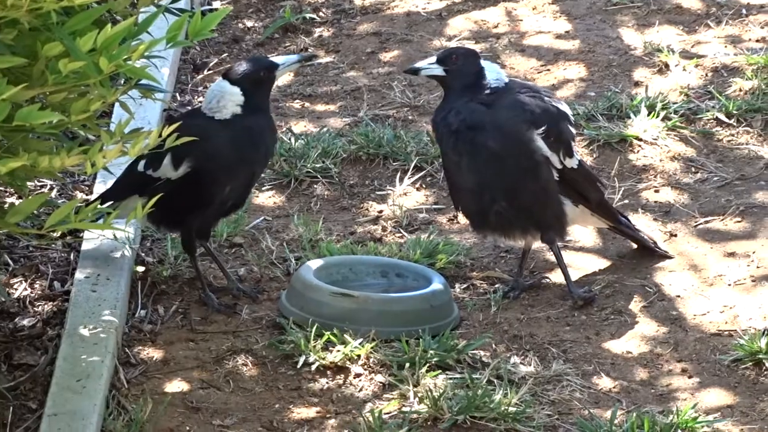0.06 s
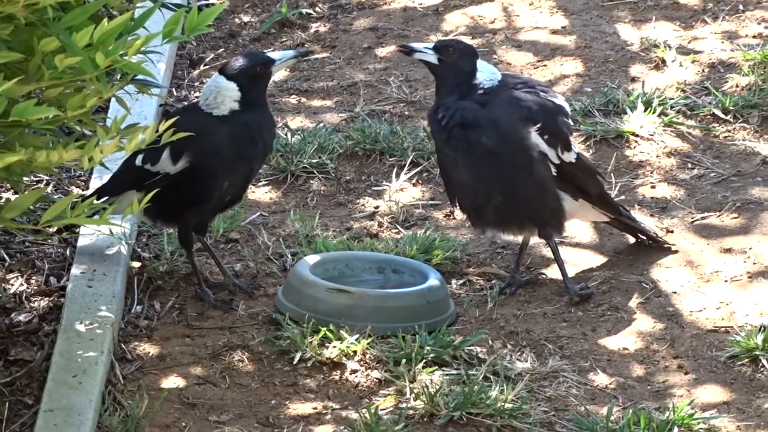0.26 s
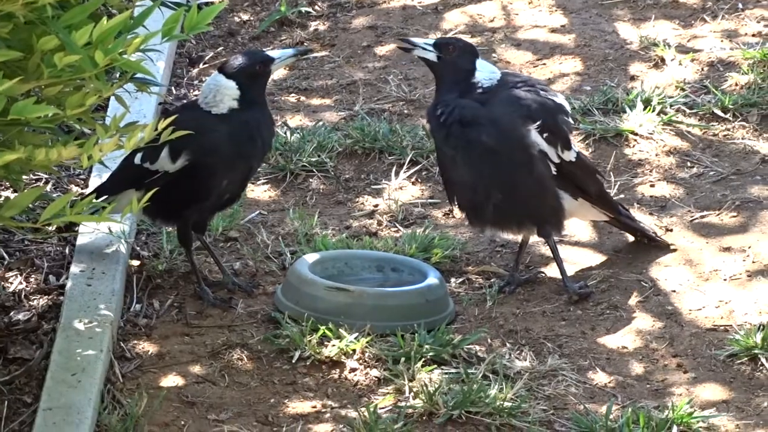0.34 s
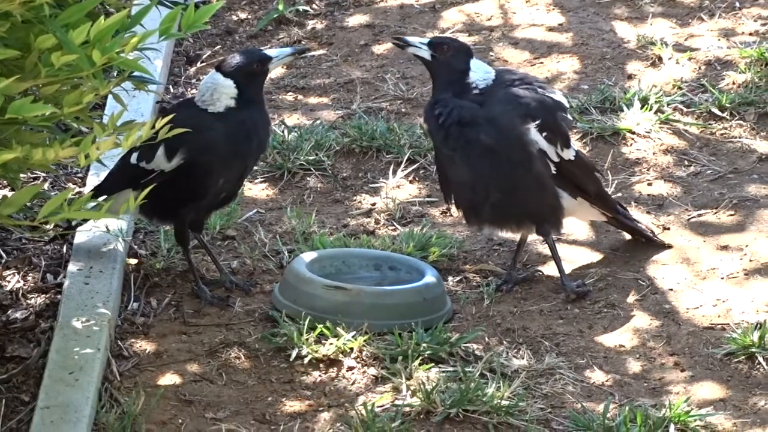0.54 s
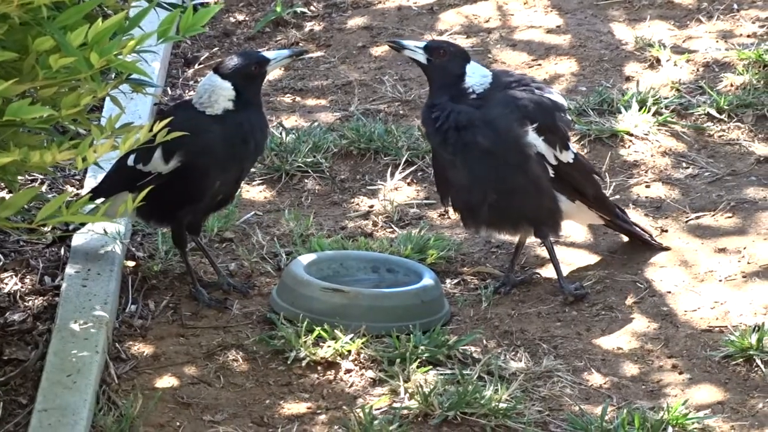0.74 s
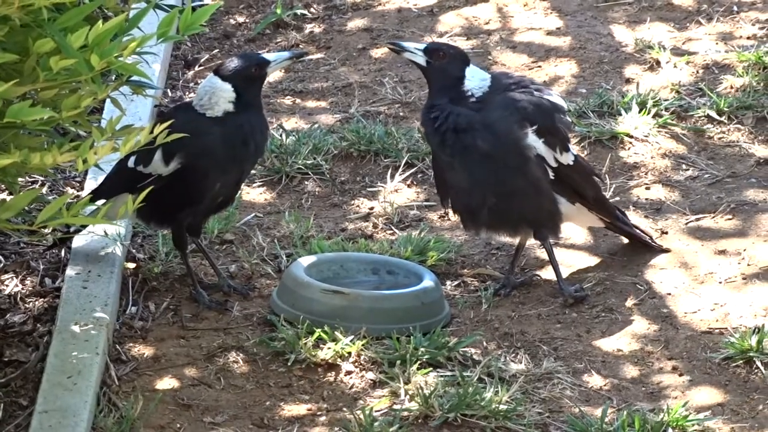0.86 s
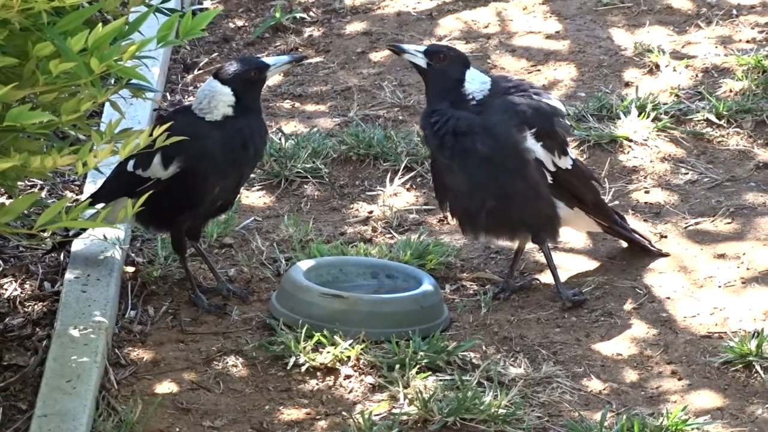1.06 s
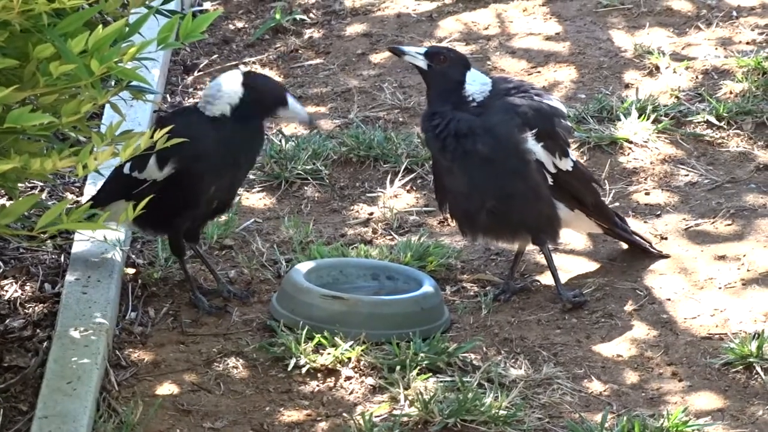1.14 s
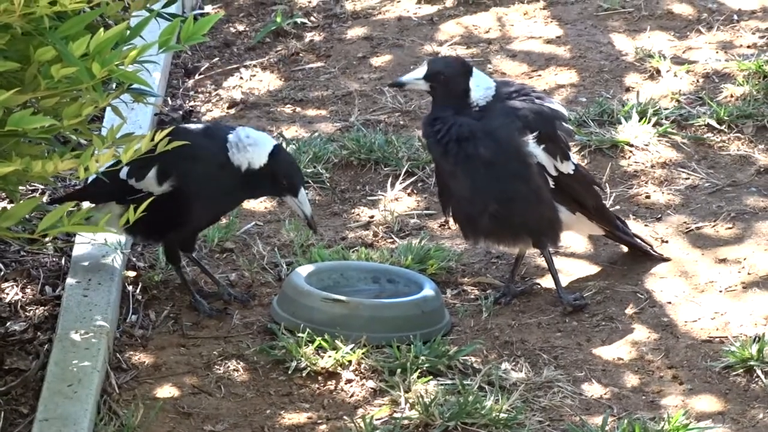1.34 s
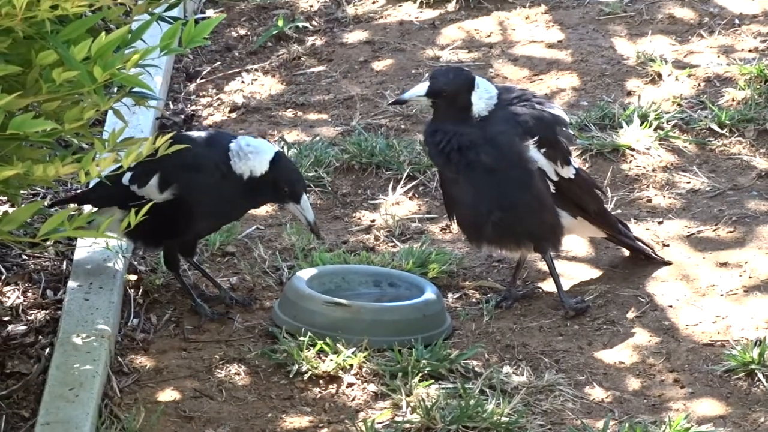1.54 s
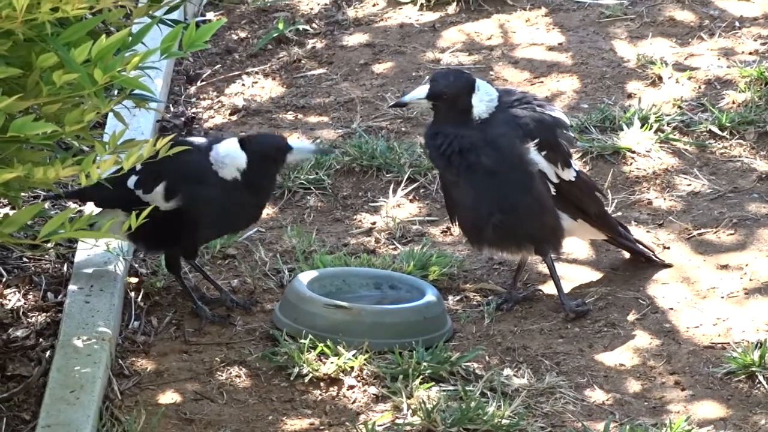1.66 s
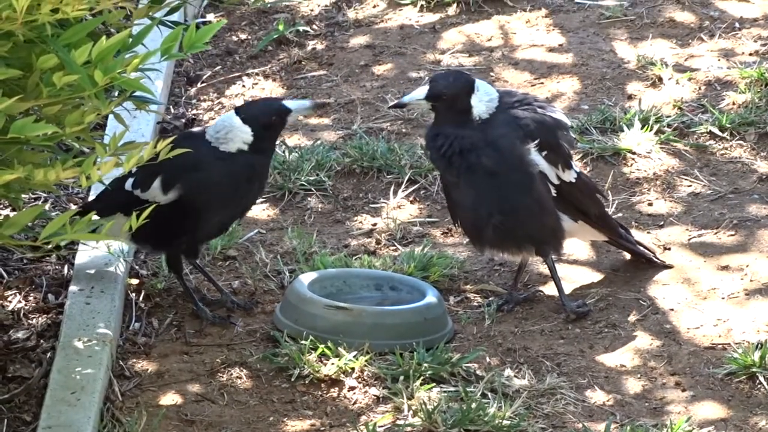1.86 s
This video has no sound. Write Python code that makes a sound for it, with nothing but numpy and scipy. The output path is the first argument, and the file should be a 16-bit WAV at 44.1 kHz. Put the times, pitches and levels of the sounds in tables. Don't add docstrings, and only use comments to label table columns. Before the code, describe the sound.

Magpie calling close by in a yard: harsh croaky squawks, then a clear falling note ending in a rattle

```python
import sys
import numpy as np
from scipy import signal
from scipy.fft import rfft, irfft
from scipy.io import wavfile
from scipy.ndimage import uniform_filter1d

SR = 44100
rng = np.random.default_rng(int(sys.argv[2]) if len(sys.argv) > 2 else 0)


def volts_from_decibels(level):
    exponent = np.asarray(level, float) / 20
    return 10 ** exponent


def generate_wav(sig):
    pcm = np.round(np.clip(np.atleast_2d(sig).T, -1, 1) * 32767).astype(np.int16)
    wavfile.write(sys.argv[1], SR, pcm)


N = 83790


def rms_one(x):
    return x / np.sqrt(np.mean(x ** 2) + 1e-20)


def at_hz(points, hz):
    point_hz, level_db = np.transpose(points)
    return np.interp(np.log(hz), np.log(point_hz), level_db)


def drift(rate_hz, size=N):
    settle = 20000
    r = np.exp(-2 * np.pi * rate_hz / SR)
    wander = signal.lfilter([1], [1, -2 * r, r * r], rng.standard_normal(size + settle))
    return rms_one(wander[settle:])


def swelling_bands(spectrum, edges_hz, patchy_db):
    # (frequency [Hz], correlation [-1 to 1])
    likeness = [(60, 1), (220, 0.93), (800, 0.51), (2930, 0.42), (10700, 0.64)]
    out = 0
    together = drift(0.17)
    white = rng.standard_normal((2, 2, N + SR))
    for k, (low, high) in enumerate(zip(edges_hz, edges_hz[1:])):
        band = signal.butter(2, [low, high], "band", fs=SR, output="sos")
        mid, side = signal.sosfilt(band, white[k % 2])[:, SR:]
        hz = np.sqrt(low * high)
        alike = np.clip(at_hz(likeness, hz), -1, 1)
        gain = volts_from_decibels(at_hz(spectrum, hz) + patchy_db * (0.6 * together + drift(6)))
        out = out + gain * (np.sqrt(1 + alike) * mid + np.sqrt(1 - alike) * side * [[1], [-1]])
    return rms_one(out)


def far_traffic():
    # (frequency [Hz], density [dB per Hz])
    rumble = [(12, -47), (20, -7.5), (92, -2.5), (179, -4), (236, -12.5), (401, -9), (492, -12.5),
              (574, -15), (1200, -17.5), (1560, -53), (2640, -120)]
    return volts_from_decibels(-49) * swelling_bands(rumble, np.geomspace(14, 1200, num=16), patchy_db=2.12)


def leaf_hiss():
    # (time [s], level [dB])
    breeze = [(0, -1.5), (.3, 2.5), (1.25, 4.5), (1.5, 3.5), (1.9, 1.1)]
    # (frequency [Hz], density [dB per Hz])
    leaf_spectrum = [(710, -29), (1200, -0.5), (1660, -3.5), (2000, -4.5), (2310, -4.5), (4110, -17.5),
                     (8350, -11), (11200, -13.5), (14500, -44), (22000, -120)]
    gain = volts_from_decibels(-61 + np.interp(np.arange(N) / SR, *np.transpose(breeze)))
    return gain * swelling_bands(leaf_spectrum, np.geomspace(1200, 12000, num=11), patchy_db=0.4)


def machinery_hum():
    # (pitch [Hz], wander [Hz], level [dB], change time [s], change [dB])
    drones = [
        (100, 5, -58, 1.2, -2),
        (173, 2.5, -55, 1.15, -8),
        (400, 18, -68, 1.7, 8),
        (930, 15, -88, 1.7, 22),
    ]
    out = 0
    t = np.arange(N) / SR
    for hz, wander_hz, db, change_s, change_db in drones:
        phase = 2 * np.pi * np.cumsum(hz + wander_hz * drift(11.94)) / SR
        changed = np.clip((t - change_s) / 0.079, 0, 1)
        level_db = db + 2.25 * drift(11) + change_db * changed
        out = out + volts_from_decibels(level_db) * np.sqrt(2) * np.sin(phase)
    return out


def note(rows, flutter_hz, high_db, breath_db, lean=0, shake=0.57, tilt_db=0):
    # (frequency [Hz], level [dB])
    throat = [(2900, -17.5), (4100, -5.5), (5200, -10), (6900, -20), (8000, -5), (8900, -14), (10050, -6),
              (10450, -30)]
    # (frequency [Hz], level [dB])
    breath_low = [(900, -58), (1500, 4.5), (2300, -7.5)]
    flutter_bend, pitch_jitter = 0.008, 0.005
    edge_s, smear_rad = 0.0022, 1.1

    s, *columns = np.transpose(rows)
    t = np.arange(N) / SR
    hz, db, octave_db, harsh = [np.interp(t, s, column) for column in columns]
    harsh = np.clip(harsh, 0, 1)
    edge = np.clip(np.minimum(t - s[0], s[-1] - t) / edge_s + 0.5, 0, 1)

    flutter = 2 * np.pi * np.cumsum(flutter_hz * (1 + 0.12 * drift(43.4))) / SR
    flutter = flutter - flutter[int(s[0] * SR)]
    bend = flutter_bend * np.sin(flutter) + pitch_jitter * drift(340)
    hz = uniform_filter1d(hz, size=130) * (1 + shake * harsh * bend)
    phase = 2 * np.pi * np.cumsum(hz) / SR
    beat = 1 + shake * harsh * (np.cos(flutter) + 0.5 * drift(84))
    tone = volts_from_decibels(db) * beat * np.sin(phase)

    smear = smear_rad * harsh * (np.sin(flutter) + 0.55 * drift(220))
    lift_db = high_db + lean * (db - octave_db) + 20 * harsh
    overtone_beat = 1 + 0.6 * harsh * np.cos(flutter)
    for k in range(2, 10):
        colour_db = 0
        if k > 2:
            flicker_db = (2.5 + harsh) * drift(67)
            colour_db = lift_db + tilt_db * (k - 3) + flicker_db + at_hz(throat, k * hz)
        level = volts_from_decibels(octave_db + colour_db) * (k * hz < 0.4 * SR)
        tone += level * overtone_beat * np.cos(k * phase + np.sqrt(k - 1) * smear)

    white = rfft(rng.standard_normal(N))
    bin_hz = np.arange(len(white)) * SR / N + 1
    breath = rms_one(irfft(white * volts_from_decibels(at_hz(breath_low + throat, bin_hz)), N))
    puffs = harsh * (1 + harsh * np.cos(flutter))
    tone += volts_from_decibels(breath_db) * (volts_from_decibels(db) + volts_from_decibels(octave_db)) * puffs * breath
    return np.sqrt(2) * edge * tone


def first_phrase():
    # (time [s], pitch [Hz], fundamental [dB], octave [dB], harshness [0-1])
    lead_in = [(0.18, 1594, -53, -82, 0), (0.186, 1477, -54.5, -89, 0.9), (0.218, 1428, -35, -82, 1),
               (0.236, 1340, -37, -77, 0.9)]
    croak = [(0.234, 1191, -50, -39.5, 0.37), (0.244, 1042, -45.5, -28.5, 0.22),
             (0.25, 1060, -34, -25, 0.1), (0.257, 1080, -38.5, -37, 0.3)]
    yelp = [(.253, 1473, -40, -66, 0.2), (.257, 1740, -28, -50, 0.091), (.261, 2060, -29.5, -28.5, .05),
            (.266, 2148, -24.5, -35.5, 0.067), (.273, 2036, -22.5, -21.5, 0.035),
            (.277, 1990, -33, -35.5, 0.27), (.282, 1570, -28.5, -64, 0.46)]
    squawk = [(0.283, 1445, -28.5, -72, 0.58), (0.291, 1373, -32.5, -70, 0.51),
              (0.301, 1321, -36, -59, 0.52), (0.314, 1278, -29, -55, 0.1), (0.326, 1254, -26.5, -45, 0.045),
              (0.337, 1179, -40.5, -30, 0.1), (0.357, 1134, -47, -26.5, 0.099),
              (0.373, 1120, -46.5, -33, 0.13), (0.41, 1080, -59, -59, 0.11)]
    side_voice = [(.325, 1600, -48, -61, .4), (.36, 1407, -42.5, -70, 0.48), (.41, 1382, -49.5, -67, 0.29)]
    return (note(lead_in, 159, high_db=-5.5, breath_db=-26.5)
            + note(croak, 197, high_db=-19.5, breath_db=-6)
            + note(yelp, 215, high_db=-9, breath_db=2)
            + note(squawk, 282, high_db=-12, breath_db=-5, lean=0.75, shake=0.4)
            + note(side_voice, 130, high_db=-18, breath_db=-23))


def second_phrase():
    # (time [s], pitch [Hz], fundamental [dB], octave [dB], harshness [0-1])
    pickup = [(.53, 2190, -44, -72, 0.12), (.534, 2087, -35, -52, .1), (.542, 1950, -39, -54, 0.22),
              (.548, 1595, -47, -55, 0.25), (.554, 1450, -50, -56, 0.3)]
    arch = [(.555, 1667, -44, -43, 0.6), (.561, 2143, -35, -40, 0.34), (.567, 2246, -25.5, -41, 0.18),
            (.576, 2278, -25, -38.5, 0.29), (.586, 2070, -28, -32.5, 0.55), (.598, 1840, -32, -38, 0.83),
            (.613, 1715, -29, -40.5, 0.99), (.637, 1724, -27, -58, 0.3), (.657, 1760, -53, -55, 0.62)]
    under_voice = [(.596, 1640, -42, -70, .5), (.614, 1575, -30, -58, .6), (.636, 1570, -32, -58, .6),
                   (.645, 1570, -39, -68, .5), (.658, 1585, -56, -84, .4)]
    return (note(pickup, 200, high_db=-7, breath_db=-4)
            + note(arch, 145, high_db=-15, breath_db=-17, shake=0, tilt_db=1.5)
            + note(under_voice, 152, high_db=3.5, breath_db=-43, shake=0, tilt_db=3.5))


def third_phrase():
    # (time [s], pitch [Hz], fundamental [dB], octave [dB], harshness [0-1])
    whistle = [(0.742, 2466, -55, -90, 0.01), (0.752, 2376, -43.5, -68, 0.01),
               (0.772, 2287, -34, -61, 0.0074), (0.782, 2290, -27.5, -68.5, 0.011),
               (0.796, 2211, -31.5, -46, 0.01), (0.846, 2188, -26, -37.5, 0.012),
               (.9, 2117, -28.5, -33, .01), (0.934, 2051, -32, -25, 0.01), (0.958, 1965, -28.5, -29, 0.044)]
    thin_voice = [(.752, 3800, -68, -90, .3), (.772, 3400, -59, -90, .7), (.79, 3200, -59, -90, .7),
                  (.81, 3080, -68, -90, .3)]
    rattle = [(.958, 1966, -33, -39, 0.29), (.963, 1959, -31, -36, 0.62), (.972, 1913, -36.5, -33, 0.76),
              (.988, 1856, -37, -37, 0.61), (1.012, 1729, -46, -39.5, 0.72), (1.036, 1757, -38.5, -40, 0.7),
              (1.048, 1836, -31, -36, 0.33), (1.063, 1960, -31.5, -46.5, 0.45),
              (1.07, 2030, -39, -58, 0.33)]
    tail_note = [(1.073, 1650, -52, -62, 0.4), (1.078, 1665, -34, -52, 0.5), (1.09, 1677, -35, -52, .6),
                 (1.1, 1680, -48, -56, .6), (1.112, 1685, -50, -66, .5), (1.14, 1689, -64, -78, 0.3)]
    return (note(whistle, 170, high_db=-5, breath_db=-21, lean=0.3, tilt_db=-1.5)
            + note(thin_voice, 233, high_db=-23, breath_db=0.0)
            + note(rattle, 155, high_db=-11, breath_db=-30, shake=0.8, tilt_db=-3.5)
            + note(tail_note, 122, high_db=-17, breath_db=-23.5))


def magpie():
    return first_phrase() + second_phrase() + third_phrase()


def soil_bounce(bird):
    lags_s = [0.00100, 0.00112]
    return volts_from_decibels(-16) * np.array([np.roll(bird, int(lag * SR)) for lag in lags_s])


def yard_echo(bird):
    t60_s, first_s = 0.3, 0.004
    t = np.arange(SR // 2) / SR
    mid, side = rng.standard_normal((2, SR // 2)) * volts_from_decibels(-60 * t / t60_s) * (t > first_s)
    tail = mid + volts_from_decibels(-7) * side * [[1], [-1]]
    tail = signal.sosfilt(signal.butter(1, 12000, fs=SR, output="sos"), tail)
    tail = tail / np.sqrt(np.sum(tail ** 2) / 2)
    return volts_from_decibels(-17) * signal.fftconvolve(bird[None], tail, axes=1)[:, :N]


def foot_rustle():
    start_s, level_db, t60_s, low_hz = 1.193, -58, 0.1, 5500
    after = np.arange(N) / SR - start_s
    bright = signal.butter(2, low_hz, "high", fs=SR, output="sos")
    hiss = signal.sosfilt(bright, rng.standard_normal(N))
    return volts_from_decibels(level_db - 60 * np.abs(after) / t60_s) * (after > 0) * hiss


def scene():
    background = far_traffic() + leaf_hiss() + machinery_hum()
    bird = magpie()
    direct = bird * volts_from_decibels(np.array([[-0.1], [0.1]]))
    return background + direct + soil_bounce(bird) + yard_echo(bird) + foot_rustle()


def top_cut(x):
    return signal.sosfilt(signal.butter(12, 11300, fs=SR, output="sos"), x)


def record(dry):
    treble_limit = signal.ellip(12, 0.5, 60, 11080, fs=SR, output="sos")
    mix = signal.sosfilt(treble_limit, dry)
    return top_cut(mix)


dry = scene()
out = record(dry)
generate_wav(out)
```